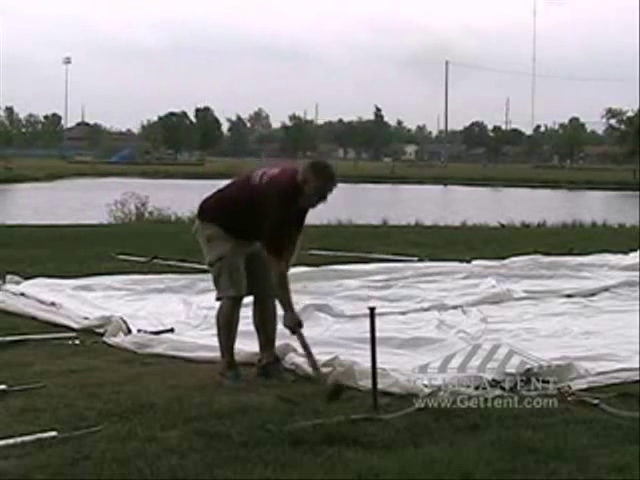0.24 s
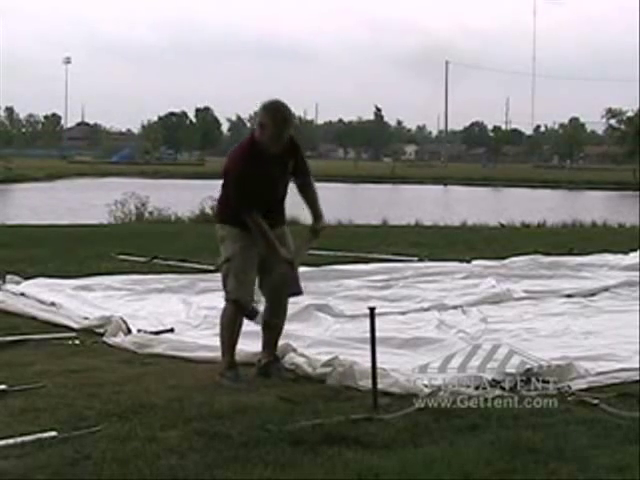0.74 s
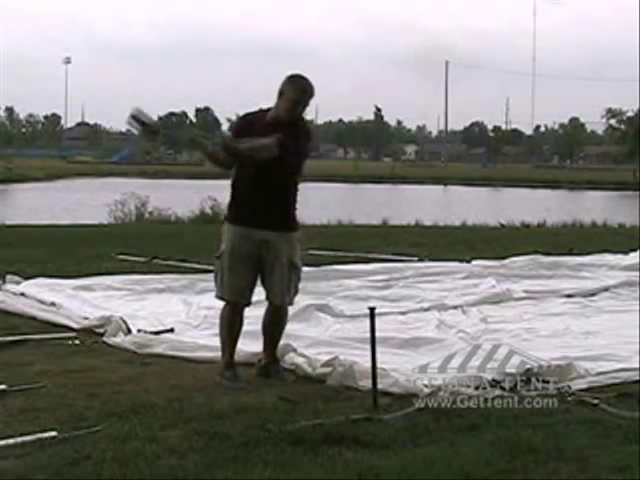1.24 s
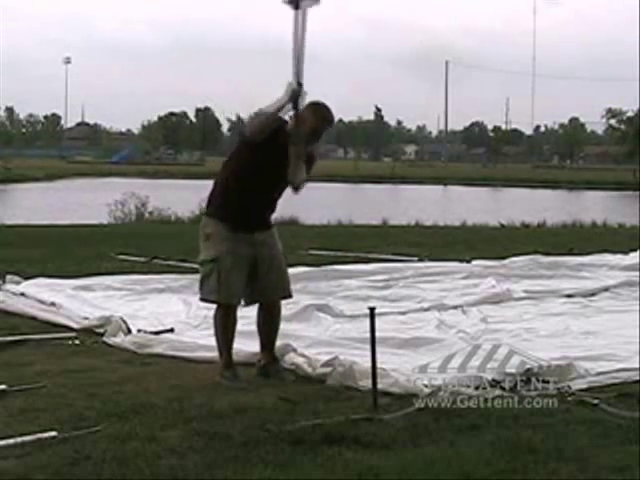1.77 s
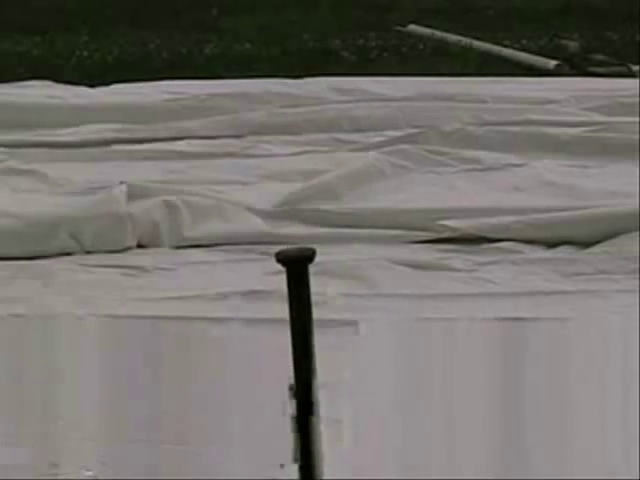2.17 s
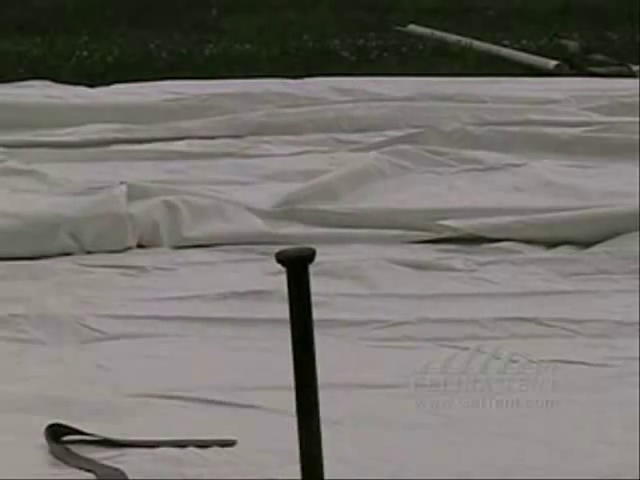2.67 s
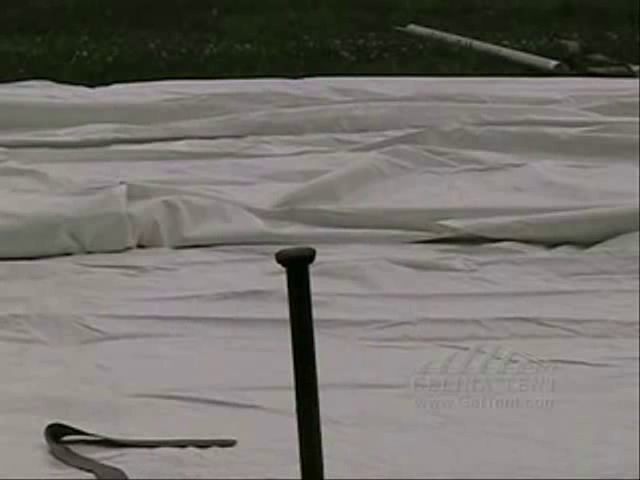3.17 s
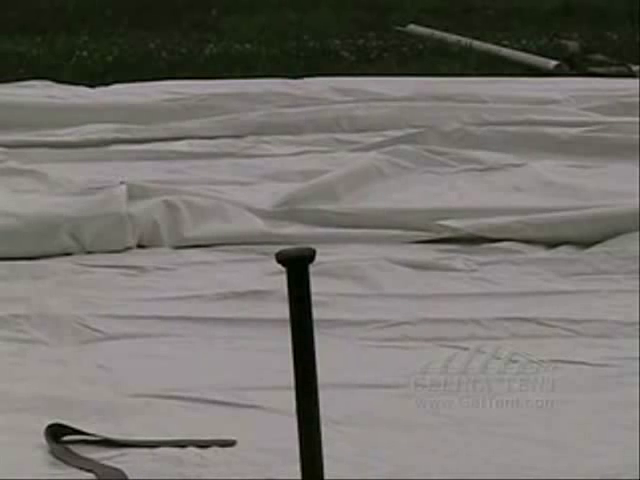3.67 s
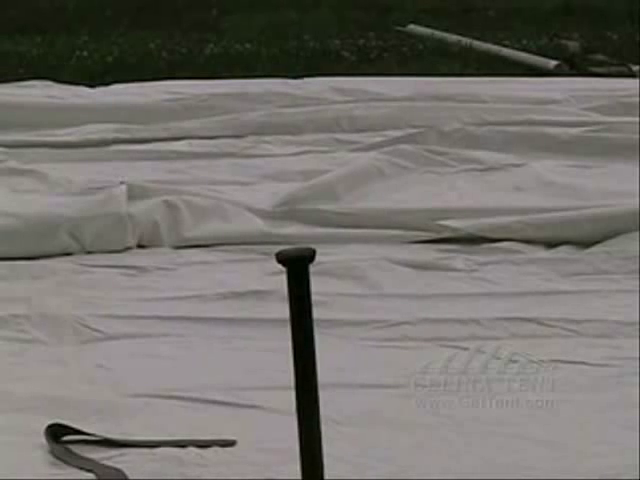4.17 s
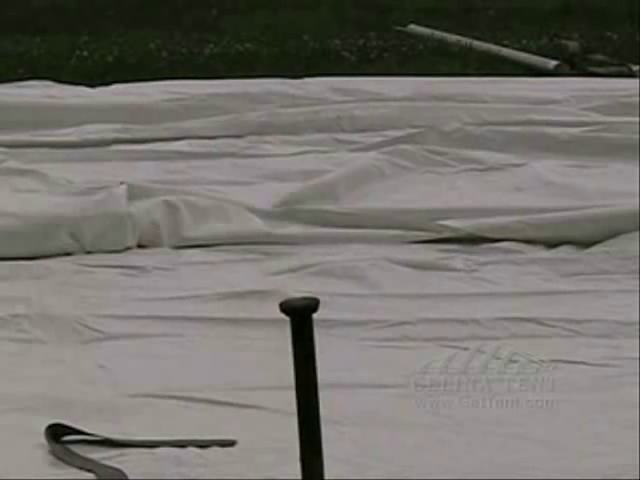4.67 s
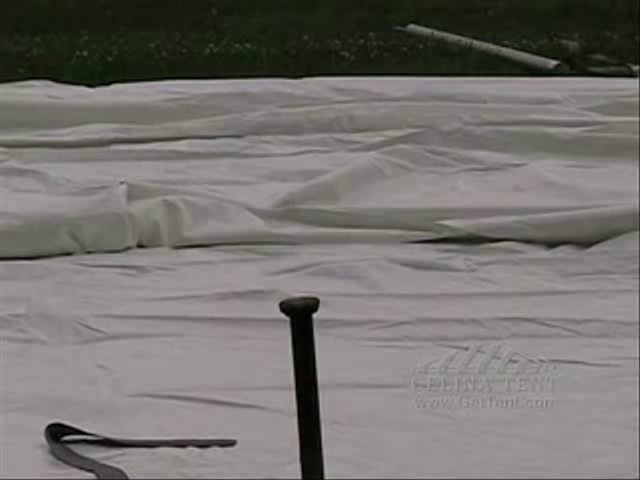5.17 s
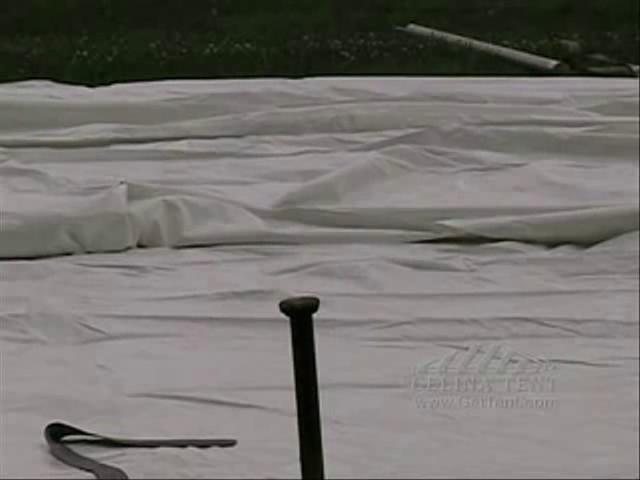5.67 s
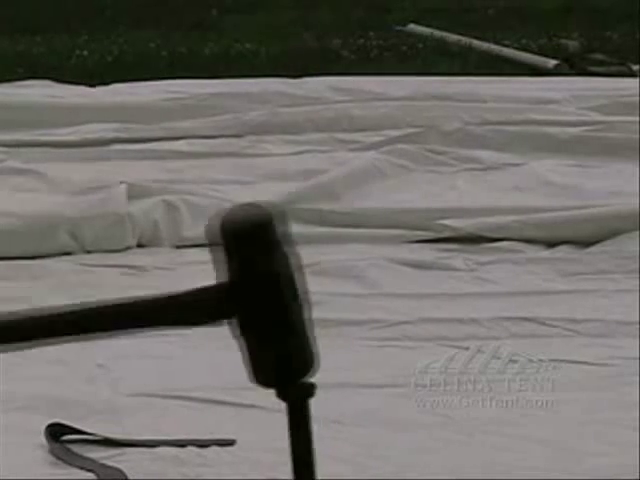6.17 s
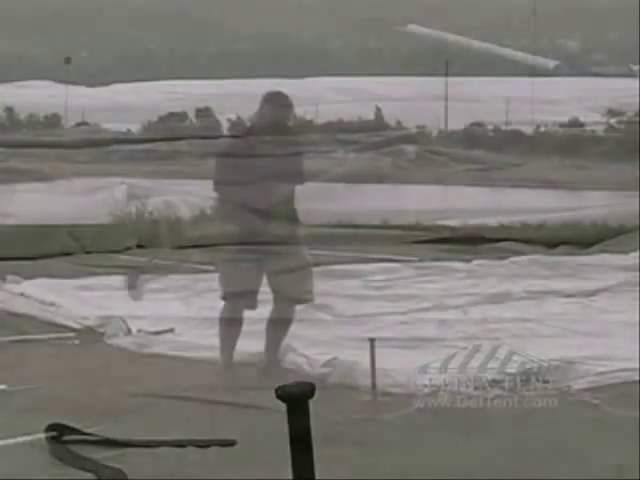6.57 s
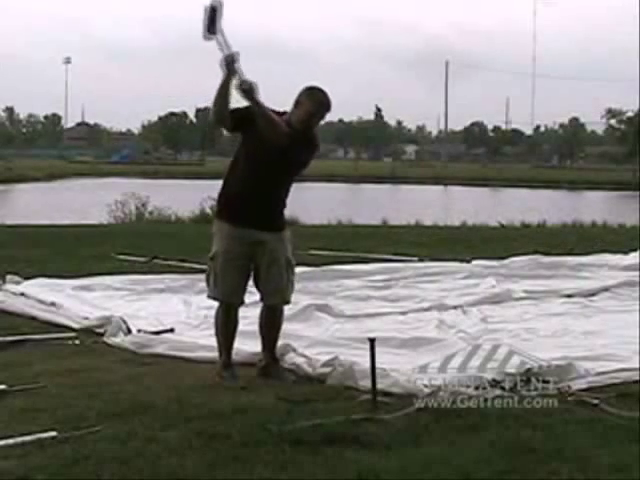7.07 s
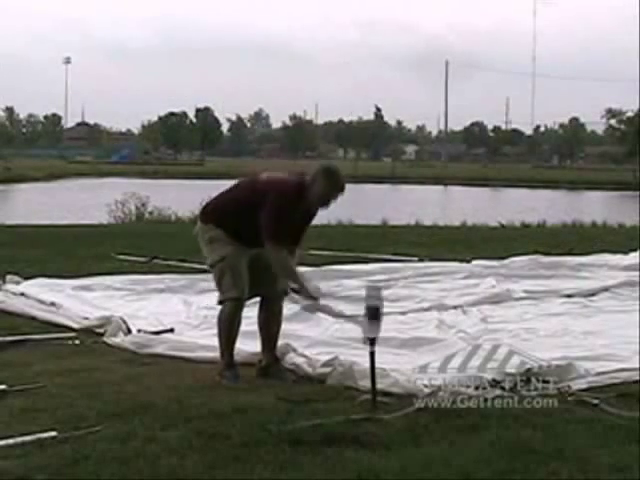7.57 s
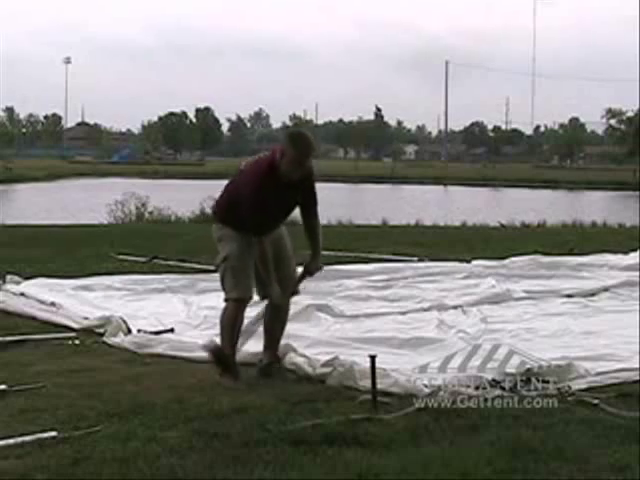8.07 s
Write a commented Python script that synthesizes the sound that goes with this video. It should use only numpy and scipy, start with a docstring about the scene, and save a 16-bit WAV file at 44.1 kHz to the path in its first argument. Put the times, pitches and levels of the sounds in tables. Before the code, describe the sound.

The stretch opens in the fading tree echo of a blow just before it, with sliding bird chirps around 0.2-0.6 s and distant tyres swelling near 1.1 s. At 1.9 s a square, very loud sledgehammer blow cracks on a steel stake, with a soil thud, rapid bounce taps and two tiny knocks just after 2.05 s. Its diffuse echo decays over about a second. Birds chirp faintly near 2.5-2.8 s. At 3.75 s a more glancing, brighter clank lands with a double bounce. A weaker, scraping edge hit follows at 5.2 s, its echo relatively strong; a clearer chirp comes at 5.8 s. The last clank, at 7.0 s, has more hammer ring, then chirps and a light rustle near 7.5 s. Low traffic, a leaf hiss and left-leaning engines, some gently rising, continue throughout. Blows distort the microphone and momentarily duck the background.

```python
"""A sledgehammer drives a steel stake into turf: slow blows, each a noise crack plus the stake's dying tones,
a soil thud and a ringing hammer head, some followed by taps. Trees return each blow as a noisy echo.
Small birds chirp as gliding tones with overtones. Distant traffic, leaves and rustles are shaped noise, engines
are wavering tones. The blows overload the microphone, and its gain control ducks for a moment after each."""
import sys
import numpy as np
from scipy import signal
from scipy.fft import rfft, irfft, next_fast_len
from scipy.io import wavfile
from scipy.ndimage import uniform_filter1d, map_coordinates

SR = 44100
rng = np.random.default_rng(int(sys.argv[2]) if len(sys.argv) > 2 else 0)


def generate_wav(signal):
    """Clip the signal to [-1, 1] and save it as 16-bit WAV at the path in sys.argv[1]."""
    frames = np.transpose(np.atleast_2d(signal))
    scaled = np.clip(frames, -1, 1) * 32767
    pcm = np.round(scaled).astype(np.int16)
    wavfile.write(sys.argv[1], SR, pcm)


N = 367794
TIME = np.arange(N) / SR

# The hammer blows. Each row: start in seconds, relative force in dB, glancing share 0-1, relative thud in dB,
# relative head ring in dB, distance off the middle of the face 0-1, relative echo in dB.
HAMMER_BLOWS = [(-.27, 5, 0.36, -11, -48, .15, -2.5), (1.8908, 7, 0.05, -7, -47, 0, -4),
                (3.754, 6, .55, -24, -43, 0.36, -1.5), (5.2106, -2.5, 0.88, -26.5, -49, 1, 8.5),
                (6.9714, 0, 0.44, -13, -35, 0.5, 4)]
# After a blow the head bounces on the stake or drops on the turf. Each row: start in seconds,
# relative force in dB, treble roll-off in Hz.
HEAD_TAPS = [(1.9064, -3, 1803), (1.919, -15.5, 2466), (2.066, -33, 4970), (2.114, -37, 6000),
             (3.772, -0.5, 9080), (3.78, 0, 9000), (3.784, -13, 6830), (3.884, -21, 450),
             (5.218, -19.5, 8950), (5.2267, -12, 4000), (5.235, -12, 4000), (6.9792, -6.5, 3985),
             (6.986, -10.5, 4000)]
# Tones of the stake, damped by the soil. Each row: pitch in Hz, relative level in dB when struck square,
# the same when struck glancing, time to fall 60 dB in seconds.
STAKE_TONES = [(503, -30.5, -16.5, .055), (960, -16.5, -7, .026), (1110, -6, -26, .026),
               (1540, -18, -8.5, 0.021), (1720, -5.5, -18.5, 0.027), (2400, -1, -18.5, 0.02),
               (2727, -24, -5, 0.13), (3680, -15, -15.5, .04), (4046, -5, -15, .058),
               (4590, -23.5, -11, 0.014), (4948, -5.5, -11.5, .036), (5400, -26, -2, .044),
               (5560, -22, -13.5, .041), (6080, -6.5, -19.5, .04), (7060, -2.5, -18, .028),
               (8200, -19, -20.5, .03), (9280, -12.5, -20, .027), (11600, -19.5, -30.5, .03),
               (13300, -28, -23, .03), (14250, -25, -30, .03)]
# Tones of the hammer head, free in the air. Each row: pitch in Hz, relative level in dB when struck mid-face,
# the same when struck at the edge, time to fall 60 dB in seconds.
HEAD_TONES = [(3890, -20, -4, 1), (5430, -24, 2, .8), (7440, -16, -1, .8), (11350, 0, -9, .42),
              (15250, -20, -26, .45)]
# Noise colour of the steel contact. Each row: frequency in Hz, relative level in dB per Hz.
CRACK_COLOUR = [(20, -41), (100, -17), (270, -7.5), (600, -7), (920, -7.5), (1400, -6), (2100, -2.5),
                (3300, -0.5), (5200, 4.5), (6600, -4.5), (8000, -6.5), (11500, -8), (15500, -16)]
# Noise colour of the soil's thud. Each row: frequency in Hz, relative level in dB per Hz.
THUD_COLOUR = [(20, -3), (60, -1.5), (160, -1), (300, -9), (700, -31), (3000, -74.5)]
# How long the trees' echo lasts. Each row: frequency in Hz, time to fall 60 dB in seconds.
TREES_DECAY = [(200, 1.7), (1500, 1.28), (4000, 1.15), (8000, 0.8), (14000, 1.32)]
# Colour of the trees' echo. Each row: frequency in Hz, relative level in dB.
TREES_TONE = [(60, -12), (400, -4.5), (1100, 0), (2500, 4), (5000, 0), (8000, -0.5), (15000, -7.5)]
# A bird's slurred call. Each row: seconds into the call, basic pitch in Hz, relative level in dB, buzz 0-1.
SLUR_SHAPE = [(0, 3683, -18.5, .04), (.011, 5070, -10, 0), (.03, 4570, -4, .1), (.035, 4700, -0.5, .9),
              (.04, 3708, -6.5, 0), (.052, 3960, 1.5, .05), (.072, 3760, 0, .7), (.094, 3262, -9, 0.6),
              (.108, 3025, -38.5, 0)]
# A bird's short arched note. Each row: seconds into the note, basic pitch in Hz, relative level in dB, buzz 0-1.
ARCH_SHAPE = [(0, 3250, -14, 0.0058), (.022, 3780, 1, 0.12), (.036, 3400, -1, .1), (.05, 3140, -33, 0.0062)]
# When slurs are sung. Each row: start in seconds, relative level in dB, pitch factor.
SLUR_CALLS = [(.219, -46, .98), (.307, -57.5, 0.99), (2.52, -64, 1.05), (2.762, -60.5, 1),
              (3.634, -60, 1.02), (4.671, -69, 1), (5.06, -61, 0.96), (5.787, -43, 1.03), (6.174, -59, .99),
              (6.9, -64, 0.96), (7.19, -51.5, 0.92), (7.575, -53.5, 0.99)]
# When arched notes are sung. Each row: start in seconds, relative level in dB, pitch factor.
ARCH_CALLS = [(.376, -51.5, 1), (.43, -55.5, .8), (.635, -63, 1.05), (2.785, -60, 0.88), (3.49, -63, 1.03),
              (3.715, -57, 1), (6.345, -70, .92), (6.56, -63.5, .8), (6.6, -63, .92), (6.73, -65, 1)]
# Noise colour of low traffic rumble. Each row: frequency in Hz, relative level in dB per Hz.
RUMBLE_COLOUR = [(15, -72.5), (25, -34), (45, -15), (70, -10.5), (97, -6), (113, -2.5), (146, -8.5),
                 (184, -2), (276, -11.5), (400, -12), (520, -38), (880, -120)]
# Noise colour of the traffic's wash. Each row: frequency in Hz, relative level in dB per Hz.
WASH_COLOUR = [(150, -21.5), (350, -4), (550, 2), (800, -1.5), (1080, -3.5), (1500, -8), (2000, -12),
               (3000, -19), (6000, -38.5)]
# Noise colour of tyres on the road. Each row: frequency in Hz, relative level in dB per Hz.
TYRE_COLOUR = [(600, -29.5), (900, -11), (1080, 2), (1300, -14), (1600, -19), (1950, -7.5), (2300, -23.5),
               (4000, -48.5)]
# Noise colour of the leaves and rustles. Each row: frequency in Hz, relative level in dB per Hz.
HISS_COLOUR = [(800, -21.5), (2200, 1), (3500, 3), (5500, 1), (6300, -5), (7200, -10), (10000, -11),
               (12000, -24), (15500, -22.5)]
# How alike left and right are in the background noise. Each row: frequency in Hz, likeness 0-1.
LEFT_RIGHT_LIKENESS = [(60, 0.072), (130, 0.55), (600, 0.32), (1400, 0.9), (3000, 0.74), (7000, 0.24),
                       (15000, .3)]
# How the background noise leans to one side. Each row: frequency in Hz, left over right in dB.
LEFT_LEAN = [(60, 9), (110, 6.5), (200, 0), (700, -3), (2400, -2), (4400, 0)]
# Cars pass on a distant road. Each row: nearest moment in seconds, tyre level in dB, width in seconds.
CAR_PASSES = [(1.12, -58.5, .17), (4.7, -63, .45), (6.1, -58.5, 0.94), (8.2, -64, 0.44)]
# Rustles: the worker's clothes and moving hammer, or leaves. Each row: peak in seconds, level in dB,
# width in seconds.
RUSTLES = [(.05, -62.5, 0.25), (.55, -60, .17), (1.39, -64, 0.052), (1.74, -67, .06), (2.6, -66.5, 0.35),
           (5.8, -68, 0.17), (7.55, -68.5, 0.23)]
# Engines pull, rising steadily in pitch. Each row: start in seconds, length in seconds, first pitch in Hz,
# rise in Hz per second, relative level in dB.
ENGINE_PULLS = [(-.2, 2.2, 94, 2.2, -57.5), (3.27, .6, 101.5, 4, -53), (4.55, 1, 89, 7.5, -58.5),
                (4.3, 2.8, 58.5, 1.6, -64), (7, 1.5, 62.5, 7, -63)]

# a square blow cracks short; a glancing one scrapes on for up to this much longer
CRACK_T60_S, SCRAPE_T60_S = 0.035, 0.031
LOW_CLANK_DB = 3.5  # lift of the clank around 1-2 kHz
ECHO_DB, ECHO_RING_DB = -30.5, 4.5  # base level of each group of trees; stake's ring within the echo
RUMBLE_DB, WASH_DB, LEAVES_DB, DRIFT_DB = -54.5, -54.5, -66.5, .5  # steady bed; drift of rumble and wash
IDLE_HZ, IDLE_DB = 108, -62.5  # a machine idling far off
PULL_FADE_S = 0.18  # each pull fades in and out over this time
PORT_LAG_S = 3.4e-5  # sound reaches the left microphone port this much after the right
TOP_HZ = 15650  # the microphone's upper limit


def sledgehammer():
    """Each blow clanks, thumps the soil, rings the head and comes back from three groups of trees."""
    out = np.zeros((2, N))
    t = np.arange(SR // 4) / SR
    long_t = np.arange(2 * SR) / SR
    low_band = signal.butter(1, [850, 1900], "bandpass", fs=SR)
    for s, db, glance, thud_db, head_db, off_centre, echo_db in HAMMER_BLOWS:
        force = amp(db - 10)
        crack_t60 = CRACK_T60_S + SCRAPE_T60_S * glance
        steel = clank(t, glance, crack_t60, ring_db=5.5)
        steel = steel + (amp(LOW_CLANK_DB) - 1) * signal.lfilter(*low_band, steel)
        thud = amp(thud_db) * noise(THUD_COLOUR, len(t)) * fade(t, t60=0.054)
        head = amp(db + head_db) * ring(HEAD_TONES, long_t, off_centre, scatter_db=2.5)
        add(out, s, ground(force * (steel + thud), scatter_db=-11.0, t60=0.02))
        add(out, s, ground(head, scatter_db=-14, t60=0.018))
        for group in range(3):  # the stake radiates a different crack in each direction
            outward = force * clank(t, glance, crack_t60, ring_db=ECHO_RING_DB)
            add(out, s, amp(ECHO_DB + echo_db) * trees(outward, rise=0.044, width=0.36))
    add_taps(out)
    return out


def add_taps(track):
    """The head bounces on the stake or drops on the turf: short clanks, each with its own loss of treble."""
    t = np.arange(SR // 4) / SR
    for s, db, bright_hz in HEAD_TAPS:
        tap = clank(t, glance=.3, crack_t60=0.023, ring_db=-1, settle=.006)
        tap = filtered(tap, lambda hz: 1 / (1 + 1j * hz / bright_hz))
        add(track, s, ground(amp(db - 4.0) * tap, scatter_db=-10.5, t60=0.05))


def clank(t, glance, crack_t60, ring_db, settle=0.019):
    """Steel on steel: a dense crack, and the stake's tones, choked when the head settles back on it."""
    crack = noise(CRACK_COLOUR, len(t)) * fade(t, crack_t60)
    choke = (1 - np.tanh((t - settle) / 0.0021)) / 2
    return crack + amp(ring_db) * choke * ring(STAKE_TONES, t, glance, scatter_db=0.5)


def ring(modes, t, offset, scatter_db):
    """Struck steel rings in dying tones; how the contact lands decides how strong each one is."""
    chance = rng.standard_normal((len(modes), 2))
    total = 0
    for (hz, centre, edge, t60), (a, b) in zip(modes, chance):
        strength = amp(centre + offset * (edge - centre) + scatter_db * a)
        total = total + strength * np.sign(b) * fade(t, t60) * np.sin(2 * np.pi * hz * t)
    return total


def ground(x, scatter_db, t60):
    """The stake stands slightly to the right; turf and canvas scatter a little of its sound sideways."""
    t = np.arange(SR // 20) / SR
    tail = rng.standard_normal(len(t)) * fade(t, t60)
    tail = tail / np.linalg.norm(tail)
    side = amp(scatter_db) * signal.fftconvolve(x, tail)[:len(x)]
    return np.array([x + side, x - side]) * amp([[-.5], [.5]])


def trees(x, rise, width, swell=0.17):
    """Scattered echo: it builds up, can swell where the nearest trees answer, and dies at a rate set by pitch."""
    hz, t, z = signal.stft(rng.standard_normal((2, SR)), SR, nperseg=256)
    clumps = amp(1.8 * unit(uniform_filter1d(rng.standard_normal(len(t)), size=3)))
    build_up = 1 - np.exp(-(t / rise) ** 2)
    nearest = 1 + swell * np.exp(-((t - .115) / 0.018) ** 2)
    z = z * clumps * build_up * nearest * fade(t, along(TREES_DECAY, hz)[:, None])
    mid, side = signal.istft(z * amp(along(TREES_TONE, hz))[:, None], SR, nperseg=256)[1]
    tail = np.array([mid + width * side, mid - width * side])
    return signal.fftconvolve(x[None], tail / np.linalg.norm(tail[0]), axes=1)


def birds():
    """Whistled slurs and short arched notes: gliding tones, roughened by fast pitch flutter, weak overtones."""
    song, t = np.zeros(N), np.arange(SR // 8) / SR
    for shape, calls in (SLUR_SHAPE, SLUR_CALLS), (ARCH_SHAPE, ARCH_CALLS):
        pitch, level_db, buzz = curves(shape, t)
        sounding = t < shape[-1][0]
        for s, db, factor in calls:
            flutter = noise([(100, -13), (300, -5.5), (700, -24.5), (2000, -74.0)], len(t))
            hz = factor * pitch * (1 + 0.11 * buzz * flutter)
            phase = 2 * np.pi * np.cumsum(hz) / SR
            overtones = amp(-17.5) * np.sin(2 * phase) + amp(-19.5) * np.sin(3 * phase)
            add(song, s, amp(db + level_db - 0.5) * sounding * (np.sin(phase) + overtones))
    return song + amp(-15.5) * trees(song, rise=0.018, width=0.605, swell=0)[:, :N]


def cars():
    """Tyres whine as cars pass: a band of noise that swells and fades."""
    return swells(CAR_PASSES) * outdoor(TYRE_COLOUR, patchy_db=3.24)


def engines():
    """Off to the left one machine idles while vehicles accelerate, their firing tones rising."""
    out = amp(IDLE_DB) * drone(IDLE_HZ, unsteady=.015, flutter_db=3.5, octave_db=-10)
    for s, length, hz, rise, db in ENGINE_PULLS:
        t = np.clip(TIME - s, 0, length)
        throttle = np.clip(np.minimum(t, length - t) / PULL_FADE_S, 0, 1)
        tone = drone(hz + rise * t, unsteady=.01, flutter_db=2.5, octave_db=-9.5)
        out = out + amp(db) * throttle * tone
    return out * amp([[3], [-4]])  # left, right


def drone(hz, unsteady, flutter_db, octave_db):
    """An engine's firing tone and its octave, a little unsteady."""
    phase = 2 * np.pi * np.cumsum(hz * (1 + unsteady * wobble(15))) / SR
    return amp(flutter_db * wobble(6)) * (np.sin(phase) + amp(octave_db) * np.sin(2 * phase))


def leaves_and_rustles():
    """High noise: a steady hiss of leaves, with swells for rustling clothes, the moving hammer or leaves."""
    return np.hypot(amp(LEAVES_DB), swells(RUSTLES)) * outdoor(HISS_COLOUR, patchy_db=0.3)


def traffic():
    """Far traffic: a low rumble and a wash above it, both noise with a slow drift in level."""
    rumble = amp(RUMBLE_DB + DRIFT_DB * wobble(2)) * outdoor(RUMBLE_COLOUR, patchy_db=0.46)
    wash = amp(WASH_DB + DRIFT_DB * wobble(0.81)) * outdoor(WASH_COLOUR, patchy_db=0.47)
    return rumble + wash


def outdoor(spectrum, patchy_db):
    """Sound from all around: stereo noise of average strength 1 with broad patches of random gain."""
    z = signal.stft(rng.standard_normal((2, N)), nperseg=512)[2]
    field = uniform_filter1d(rng.standard_normal(z.shape[1:]), size=12, axis=0)  # across pitch
    field = uniform_filter1d(field, size=30, axis=1)  # across time
    pair = signal.istft(z * amp(patchy_db * unit(field)), nperseg=512)[1][:, :N]

    def mid_side(hz):
        turn = np.arccos(np.clip(along(LEFT_RIGHT_LIKENESS, hz), -1, 1)) / 2
        return amp(along(spectrum, hz)) * [np.cos(turn), np.sin(turn)]

    mid, side = filtered(pair, mid_side)
    stereo = np.array([mid + side, mid - side])
    return unit(filtered(stereo, lambda hz: amp(np.outer([.5, -.5], along(LEFT_LEAN, hz)))))


def swells(rows):
    """Summed level of things that come and go, each a bell around its peak time."""
    power = 0
    for s, db, width in rows:
        bell = amp(db) / (1 + .5 * ((TIME - s) / width) ** 2)
        power = power + bell ** 2
    return np.sqrt(power)


def amp(db):
    """Turn dB into a plain multiplier."""
    return 10 ** (np.asarray(db) / 20)


def unit(x):
    """Scale to an average strength (rms) of 1."""
    return x / np.sqrt(np.mean(x ** 2) + 1e-20)


def along(points, hz):
    """Read a curve of (Hz, value) points on a log axis."""
    f, v = np.transpose(points)
    return np.interp(np.log(hz + 1), np.log(f + 1), v)


def curves(rows, t):
    """Each column after the time, read at times t."""
    s, *cols = np.transpose(rows)
    return [np.interp(t, s, c) for c in cols]


def fade(t, t60):
    """Die away by 60 dB in t60 seconds."""
    return np.exp(-np.log(1000) * t / t60)


def wobble(rate):
    """A smooth random curve through rate random points a second."""
    return map_coordinates(rng.standard_normal(int(N * rate / SR) + 4), [TIME * rate])


def filtered(x, response):
    """Multiply each frequency of x by the response there."""
    n = x.shape[-1]
    m = next_fast_len(n + SR // 2)
    return irfft(rfft(x, m) * response(np.fft.rfftfreq(m, 1 / SR)), m)[..., :n]


def noise(spectrum, n):
    """Coloured noise of average strength (rms) 1."""
    return unit(filtered(rng.standard_normal(n), lambda hz: amp(along(spectrum, hz))))


def add(track, s, sound):
    """Mix a sound into the track from time s, trimmed at both ends."""
    start = round(s * SR)
    part = sound[..., max(-start, 0):N - start]
    track[..., max(start, 0):max(start, 0) + part.shape[-1]] += part


def scene():
    """All sources together; the sound reaches the right microphone port a little before the left."""
    mix = sledgehammer() + birds() + cars() + engines() + leaves_and_rustles() + traffic()
    return filtered(mix, lambda hz: np.exp(np.pi * 1j * PORT_LAG_S * np.outer([-1, 1], hz)))


def gain_control(x, limit_db, attack, release):
    """Peaks over the limit pull the gain down; it creeps back over the release time (both times in seconds)."""
    over = np.maximum(20 * np.log10(np.abs(x).max(axis=0) + 1e-9) - limit_db, 1e-9)
    # hold each peak and let it decay until a stronger one takes over
    held = np.exp(np.maximum.accumulate(np.log(over) + TIME / release) - TIME / release)
    pole = np.exp(-1 / (attack * SR))
    return x * amp(-signal.lfilter([1 - pole], [1, -pole], held))


def record(dry):
    """The microphone: gain control, then overload that rounds off peaks, then a steep treble limit."""
    x = gain_control(dry, limit_db=-1.5, attack=0.0041, release=.09)
    x = x / (1 + (x / amp(-4)) ** 4) ** (1 / 4)
    return filtered(x, lambda hz: 1 / (1 + (hz / TOP_HZ) ** 120))


dry = scene()
out = record(dry)
generate_wav(out)
```